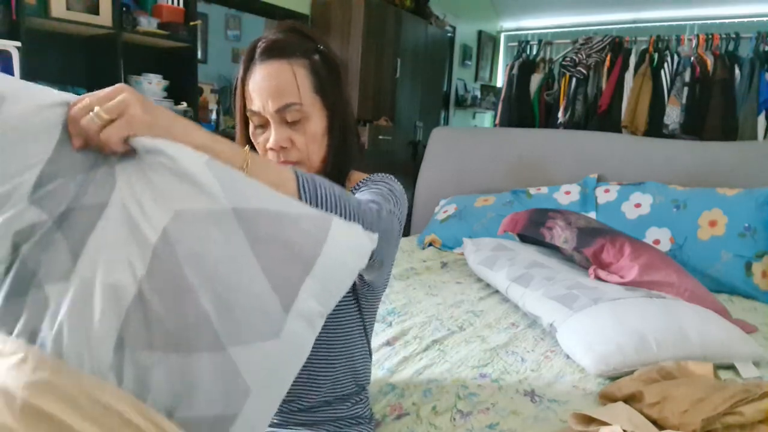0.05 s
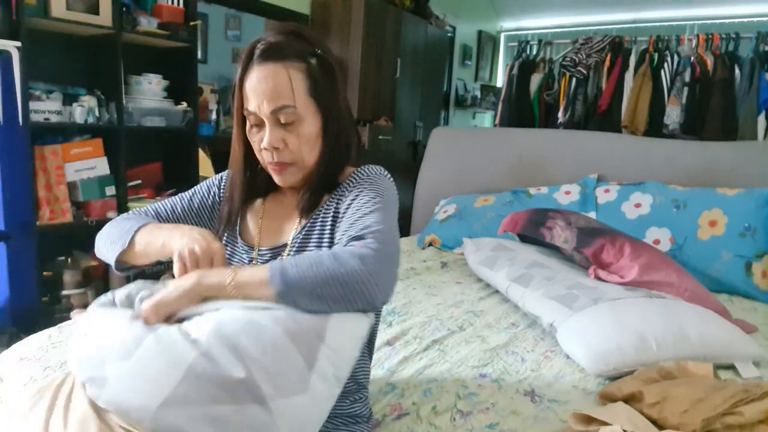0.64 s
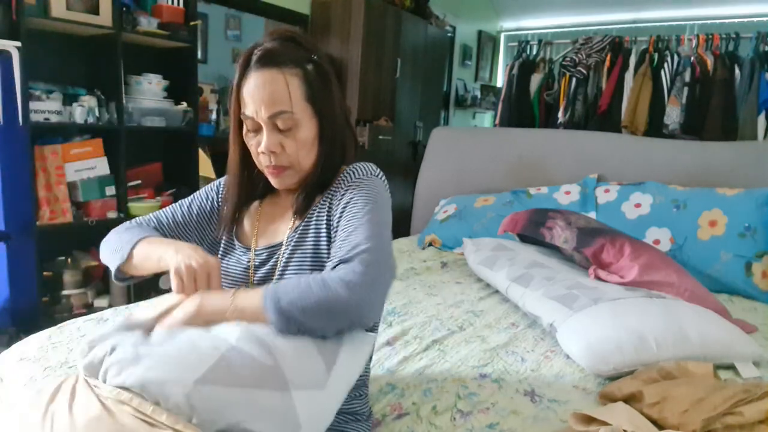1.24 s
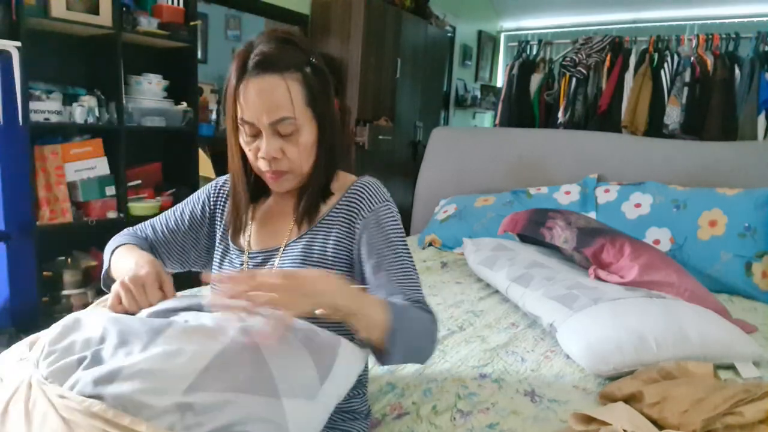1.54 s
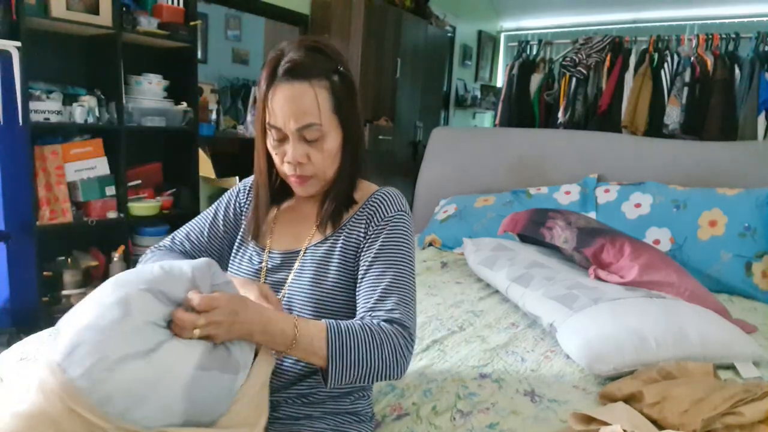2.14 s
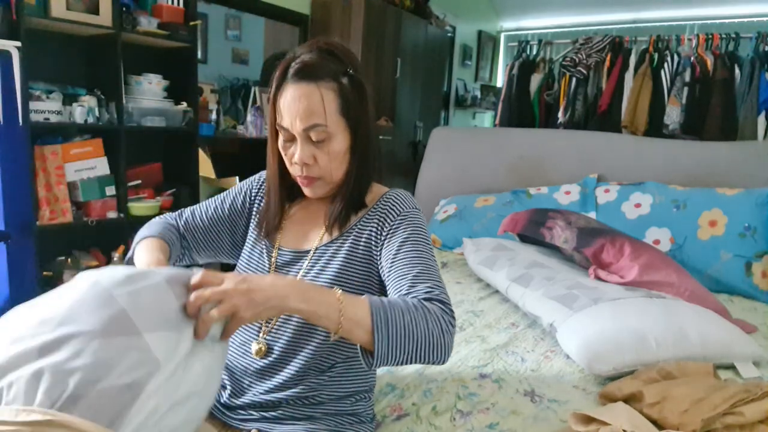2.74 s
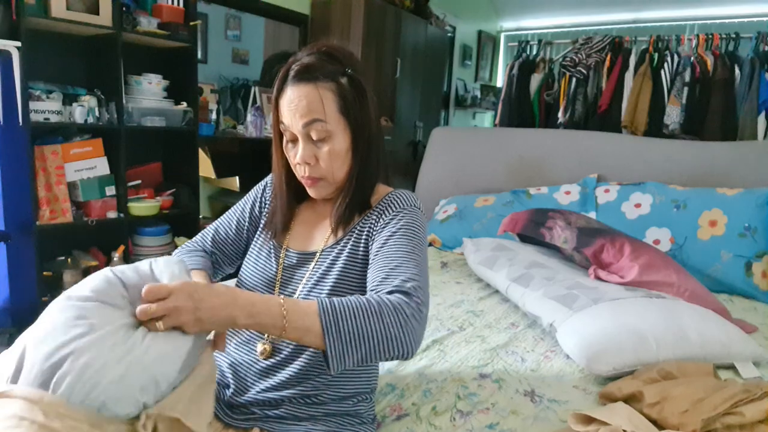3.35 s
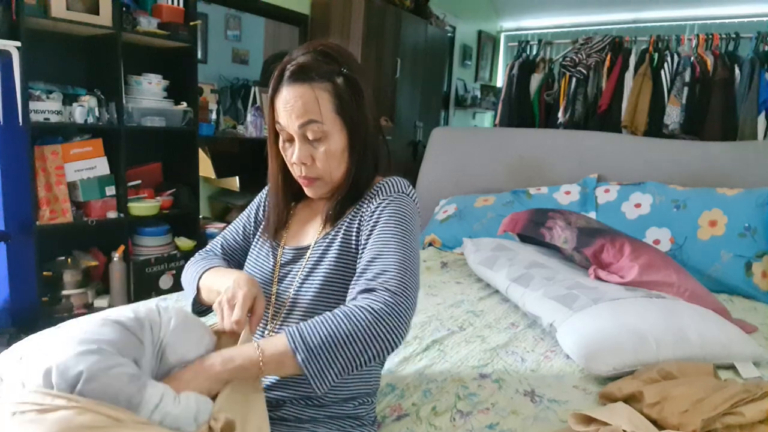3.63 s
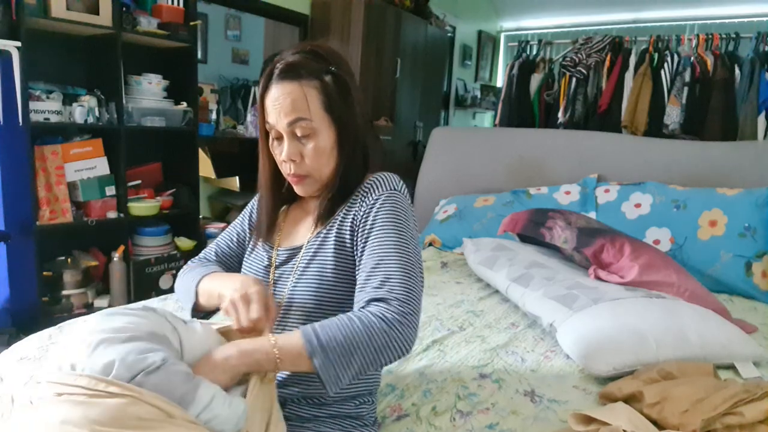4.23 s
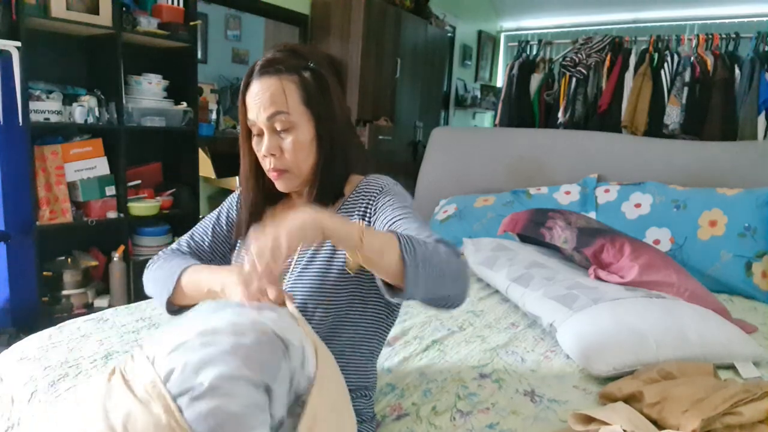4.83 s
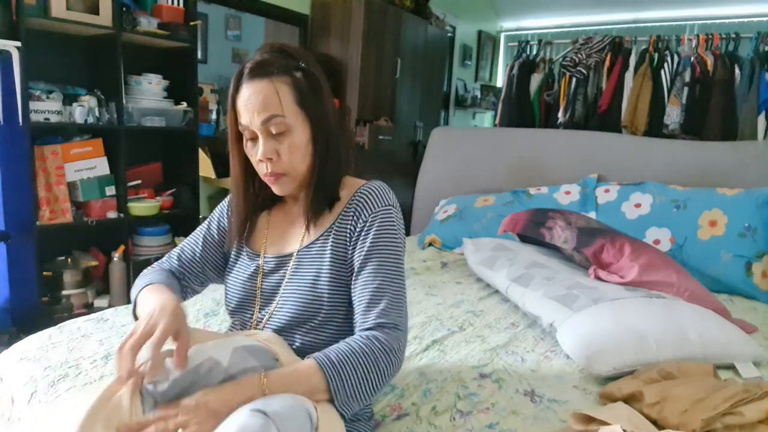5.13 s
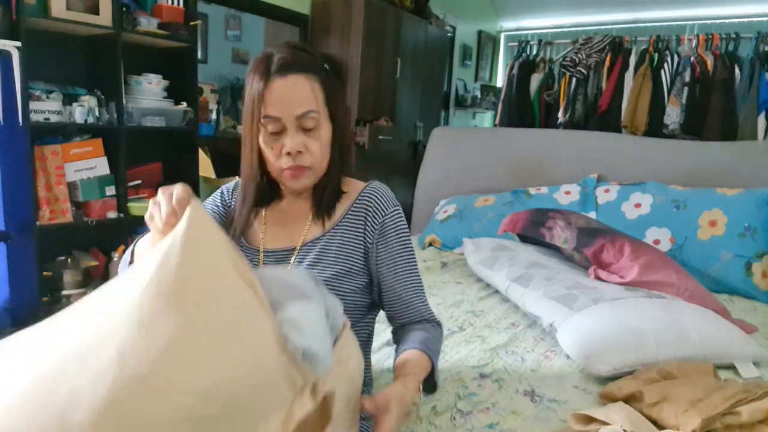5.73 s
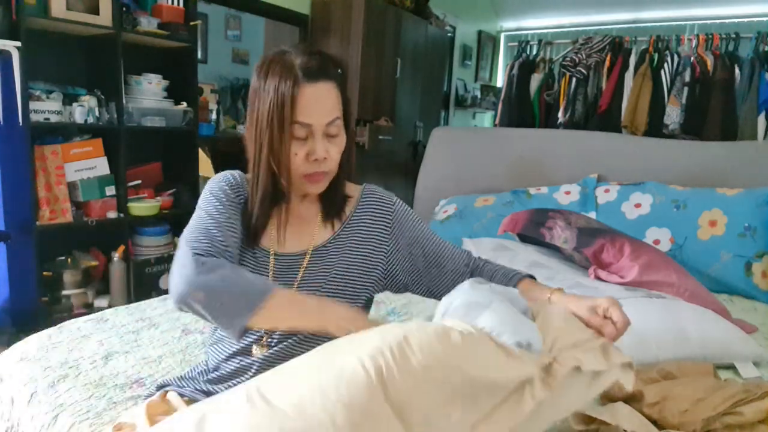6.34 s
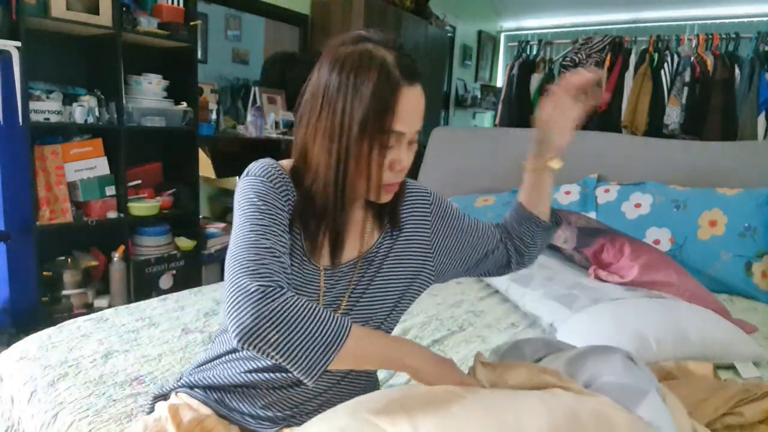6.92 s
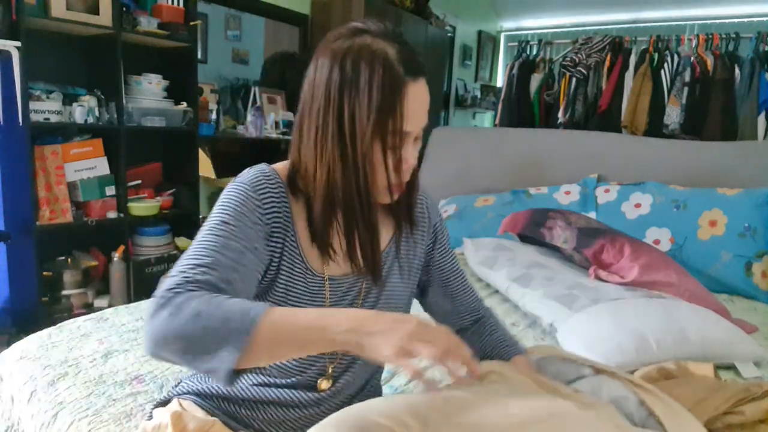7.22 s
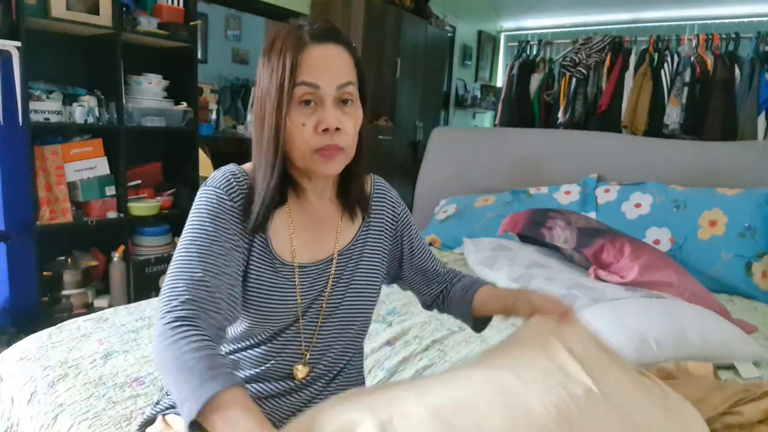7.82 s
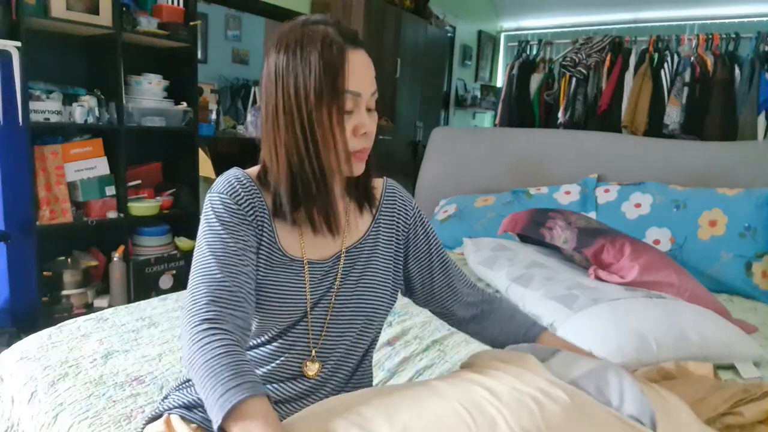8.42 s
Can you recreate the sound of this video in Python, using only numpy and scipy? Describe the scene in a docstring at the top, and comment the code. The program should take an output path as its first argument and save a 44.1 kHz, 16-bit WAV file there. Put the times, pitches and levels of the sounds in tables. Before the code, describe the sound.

Soft cloth rustles as a pillow is worked into its case, then come two loud slaps on the pillow and a lighter one.

```python
"""Three slaps on a pillow: each a smack of palm on cotton, a push of air and a boom from the bed.
Around them the pillow is worked into its case: threads hiss, stuffing rubs, folds pop taut
and jewellery clinks on the moving hands, all in a small furnished bedroom.
Outside, over a low rumble, an engine hums away, a small horn toots twice and something calls far off."""
import sys
import numpy as np
from scipy import signal
from scipy.fft import rfft, irfft, next_fast_len
from scipy.io import wavfile
from scipy.ndimage import uniform_filter1d

SR = 44100
rng = np.random.default_rng(int(sys.argv[2]) if len(sys.argv) > 2 else 0)


def transcribe(u):
    """Save the signal u as a 16-bit wav file named by the first command-line argument.

    u: samples, shape (n,) or (channels, n), limited to [-1, 1]; the rate is SR.
    q: integer samples, one column per channel.
    """
    v = np.clip(np.atleast_2d(u).T, -1, 1)
    q = np.round(v * 32767).astype(np.int16)
    wavfile.write(sys.argv[1], SR, q)


N = 377932
TIME = np.arange(N) / SR


def amp(db):
    """Decibels to gain."""
    return 10 ** (np.asarray(db) / 20)


def unit(x):
    """Scales to an rms of one."""
    return x / np.sqrt(np.mean(x ** 2) + 1e-20)


def read(curve, hz):
    """Reads a curve on a log-frequency axis."""
    f, value = np.transpose(curve)
    return np.interp(np.log(hz + 1), np.log(np.abs(f) + 1), value)


def add(mix, s, sound):
    """Drops a sound into the mix at time s."""
    part = mix[..., max(round(s * SR), 0):][..., :sound.shape[-1]]
    part += sound[..., :part.shape[-1]]


def bins(x):
    """Frequencies of the spectrum of x."""
    return np.fft.rfftfreq(x.shape[-1], 1 / SR)


def colour(x, eq):
    """Applies an EQ curve and scales to an rms of one."""
    return unit(irfft(rfft(x) * amp(read(eq, bins(x))), x.shape[-1]))


def drift(rate_hz):
    """Random modulation, smooth above the given rate."""
    noise = rng.standard_normal(next_fast_len(N, real=True))
    return unit(irfft(rfft(noise) / (1 + (bins(noise) / rate_hz) ** 4), len(noise))[:N])


def touch(t, swell, fall):
    """Contact force: a smooth hump with its own rise and fall."""
    return np.exp(-(t / np.where(t < 0, swell, fall)) ** 2)


def delay_pan(x, lag_s):
    """Places a near sound by making it reach the left ear late (early if negative)."""
    left = irfft(rfft(x) * np.exp(-2j * np.pi * bins(x) * lag_s), len(x))
    return np.array([left, x])


def burst(t, envelope, eq, even_hz=300):
    """A puff of noise, flattened and then EQed, with the energy of its envelope."""
    spectrum = rfft(rng.standard_normal(len(t)) * envelope)
    width = max(round(even_hz * len(t) / SR), 1)
    spectrum /= np.sqrt(np.abs(uniform_filter1d(np.abs(spectrum) ** 2, width)) + 1e-20)
    return colour(irfft(spectrum, len(t)), eq) * np.sqrt(np.mean(envelope ** 2))


# Stereo image of diffuse sound: f/Hz, left-right correlation
STEREO_LIKENESS = [(60, 0.9), (130, 0.95), (290, 0.58), (640, 0.35), (1410, -0.19), (3100, 0.027),
                   (7000, -0.28)]


def diffuse(pair):
    """Long waves reach both ears alike: centred bass, wide treble."""
    left, other = rfft(pair)
    likeness = np.clip(read(STEREO_LIKENESS, bins(pair)), -1, 1)
    right = likeness * left + np.sqrt(1 - likeness ** 2) * other
    return irfft(np.array([left, right]), pair.shape[-1])


# Short, dead bedroom reverb: f/Hz, t60/s
ROOM_DECAY = [(100, .32), (500, 0.16), (2000, 0.17), (6000, 0.16), (12000, 0.12)]


def room(x, wet_db, predelay_s=0.0011):
    """Dense reflections from near walls, each band dying at its own speed."""
    taps = diffuse(rng.standard_normal((2, SR // 2)))
    hz, t, bands = signal.stft(taps, SR, nperseg=256)
    decay = amp(-60 * t / read(ROOM_DECAY, hz)[:, None])
    tail = signal.istft(bands * decay, SR, nperseg=256)[1]
    tail *= np.clip(np.arange(tail.shape[1]) / SR / predelay_s - 1, 0, 1)
    tail /= np.linalg.norm(tail[0])
    return amp(wet_db) * signal.fftconvolve(x[None], tail, axes=1)[:, :N]


# Bass-heavy EQ of the ambience: f/Hz, level/dB
RUMBLE_EQ = [(15, -54), (25, -11.5), (59, 7.5), (120, -3.5), (180, -12), (236, -9), (301, -16.5),
             (575, -22.5), (1230, -29), (1560, -24), (2000, -30.5), (6740, -42.5), (9320, -51),
             (14800, -51.5), (16000, -41.5)]


def room_tone(level_db=-56, swell_db=0.6):
    """Low, gently swelling rumble of the house and the traffic beyond."""
    rumble = colour(diffuse(rng.standard_normal((2, N))), RUMBLE_EQ)
    return amp(level_db + swell_db * drift(2.8)) * rumble


# Fader ride of the engine as it moves off: t/s, level/dB
ENGINE_FADE = [(0, -62.5), (1.2, -59.5), (2.2, -62), (3.4, -60.5), (4.2, -66.5), (4.8, -63.5), (5.3, -82)]


def engine(firing_hz=127.8, sag_hz_per_s=1.15, waver=.004, octave_db=-12, throb_db=.9):
    """An engine in the street hums at its slowly sinking firing rate."""
    s, db = np.transpose(ENGINE_FADE)
    pitch = (firing_hz - sag_hz_per_s * TIME) * (1 + waver * drift(9.3))
    phase = 2 * np.pi * np.cumsum(pitch) / SR
    hum = unit(np.sin(phase) + amp(octave_db) * np.sin(2 * phase))
    return amp(np.interp(TIME, s, db) + throb_db * drift(4)) * hum


def far_tone(pitch, fading):
    """A sine that fades in and out as its many paths interfere."""
    start = rng.integers(N - SR)
    return np.sin(2 * np.pi * np.cumsum(pitch) / SR) * fading[start:][:len(pitch)]


# Horn cues: t/s, length/s, level/dB
HORN_TOOTS = [(1.9, 0.27, -63), (2.16, 0.24, -63)]
# Thin ring of its diaphragm: harmonic number, level/dB
HORN_PARTIALS = [(6, -21), (7, -16), (8, 4.5), (9, -10), (10, -8.5)]


def horn(wobble, fading, root_hz=447.4, waver=.0025):
    """A small horn toots twice, its diaphragm ringing in high harmonics."""
    out = np.zeros(N)
    for s, length, db in HORN_TOOTS:
        count = round(length * SR)
        pitch = root_hz * (1 + waver * wobble[round(s * SR):][:count])
        tone = sum(amp(level) * far_tone(k * pitch, fading) for k, level in HORN_PARTIALS)
        add(out, s, amp(db) * unit(tone) * np.hanning(count))
    return out


# Distant call cues: t/s, length/s, start f/Hz, end f/Hz, level/dB
CALL_GLIDES = [(2.5, 0.32, 1925, 1870, -79.5), (3.119, 0.3, 1886, 1880, -80),
               (5.345, 0.054, 1454, 1418, -59), (7.044, 0.12, 837, 554, -60), (7.67, 0.16, 531, 513, -62.5),
               (7.86, 0.15, 505, 478, -61)]


def far_calls(wobble, fading, waver=0.032):
    """Faint calls, each one wavering tone that slides down."""
    out = np.zeros(N)
    for s, length, start_hz, end_hz, db in CALL_GLIDES:
        count = round(length * SR)
        pitch = np.linspace(start_hz, end_hz, count) * (1 + waver * wobble[round(s * SR):][:count])
        add(out, s, amp(db) * unit(far_tone(pitch, fading)) * signal.windows.tukey(count, .6))
    return out


def street(flutter_db=2):
    """The outdoor layer: the engine stays dry, horn and calls echo in the room."""
    hum = engine()
    wobble, fading = drift(120), amp(flutter_db * drift(14))
    far = horn(wobble, fading) + far_calls(wobble, fading)
    return hum + amp(-3) * far + room(far, wet_db=0)


# Bracelet and chain hits: t/s, level/dB, ring f/Hz
LINK_HITS = [(1.295, -64.5, 9600), (1.598, -50, 5220), (1.607, -57, 5070), (1.621, -60, 9700),
             (1.653, -59, 4970), (1.767, -57, 13000), (5.084, -82, 9300), (5.51, -68, 9600),
             (7.057, -68, 10600), (7.539, -55.5, 10400), (7.964, -72, 10900), (8.242, -47, 10240)]
# Broad EQ of the tick and narrow EQ of the ring: multiple of the ring pitch, level/dB
TICK_EQ = [(.25, -24.5), (.7, -6), (1, 11.5), (1.3, 0), (1.7, -2.5), (3, -6)]
RING_EQ = [(.5, -35), (.88, -19), (.97, -3), (1, 0), (1.05, -5), (1.12, -11), (1.25, -22), (2, -30)]


def jewellery(ring_db=-7, ring_fall=0.012, tick_fall=0.0026):
    """Small metal links touch: a dry tick and a short, rattling ring."""
    t, out = np.arange(2 ** 13) / SR, np.zeros((2, N))
    skin_damping = np.exp(-t / .04)
    for s, db, hz in LINK_HITS:
        tick = burst(t, np.exp(-t / tick_fall), np.array(TICK_EQ) * [hz, 1])
        ring = burst(t, np.exp(-t / ring_fall), np.array(RING_EQ) * [hz, 1])
        add(out, s, amp(db) * (tick + amp(ring_db) * ring) * skin_damping)
    return out * amp([[-1.5], [1.5]]) + room(out.mean(0), wet_db=-4)


# Folds pulled taut: t/s, level/dB, f/Hz, decay/s
FOLD_POPS = [(1.044, -52, 666, 0.0027), (1.483, -57.5, 760, .0015), (1.606, -55, 587, 0.0034),
             (2.329, -33.5, 667, 0.00087), (2.536, -52, 666, 0.0012), (3.125, -47, 550, 0.0029),
             (3.33, -49.5, 182, 0.0037), (4.329, -49, 636, 0.0015), (4.397, -50.5, 610, 0.005),
             (4.45, -53, 520, 0.011), (5.558, -45, 730, 0.0021), (5.981, -56.5, 600, 0.0056),
             (6.481, -51, 280, 0.0059), (6.916, -56.5, 474, 0.0093), (7.887, -55, 650, 0.0016)]


def flicks(attack_s=0.00046, skirt_db=-14, lead_s=.02):
    """A slack fold snaps taut with a soft, hollow pop."""
    t, out = np.arange(2 ** 13) / SR - lead_s, np.zeros(N)
    for s, db, hz, fall in FOLD_POPS:
        hollow = [(hz / 8, -25), (hz / 1.55, -8), (hz, 0),
                  (hz * 1.35, skirt_db), (hz * 4, -24), (hz * 16, -48)]
        envelope = np.exp(np.minimum(t / attack_s, -t / fall))
        add(out, s - lead_s, amp(db) * burst(t, envelope, hollow))
    return delay_pan(out, -0.00016) + room(out, wet_db=-5)


def shifting_folds(x, depth_db, patch_frames=12, patch_bins=4):
    """Moving folds lift and shade narrow bands for a moment."""
    bands = signal.stft(x, SR, nperseg=512)[2]
    patches = uniform_filter1d(rng.standard_normal(bands.shape[1:]), patch_bins, 0)
    patches = unit(uniform_filter1d(patches, patch_frames, 1))
    return unit(signal.istft(bands * amp(depth_db * patches), SR, nperseg=512)[1][:, :N])


def effort(times, lengths, levels_db, fidget_db, rise_share=0.6, swing_db=2, flutter_db=1.36):
    """A hand gathers speed and stops; between strokes the cloth never lies quite still."""
    power = amp(fidget_db + swing_db * drift(5.1)) ** 2
    for s, length, db in zip(times, lengths, levels_db):
        power += (amp(db) * touch(TIME - s, rise_share * length, (1 - rise_share) * length)) ** 2
    return np.sqrt(power) * amp(flutter_db * drift(30))


# Pushes and pulls on the case: peak t/s, length/s, hiss level/dB, rub level/dB
HAND_STROKES = [(.05, 0.25, -79, -66.5), (0.275, 0.17, -68.5, -65), (0.465, 0.22, -74.5, -73),
                (1.03, 0.13, -74, -81), (1.415, 0.13, -69, -64), (1.632, 0.075, -66, -67),
                (1.88, 0.21, -74.5, -70.5), (2.05, 0.078, -77, -75.5), (2.31, 0.34, -70.5, -70),
                (2.469, 0.083, -67.5, -72), (3.19, 0.12, -82, -67), (3.57, 0.26, -73.5, -79),
                (3.71, 0.12, -62, -65.5), (3.912, 0.064, -72, -69), (4.075, 0.084, -75, -86),
                (4.295, 0.11, -68, -64.5), (4.534, 0.17, -62.5, -63.5), (4.78, 0.13, -74, -72),
                (4.924, 0.098, -65.5, -71), (5.46, 0.38, -74, -72), (5.653, 0.13, -58.5, -57.5),
                (6.074, 0.13, -73, -63), (6.225, 0.054, -61, -62), (6.42, 0.58, -77, -72),
                (6.634, .05, -73.5, -82.5), (6.784, 0.18, -76.5, -74), (6.86, .04, -68.5, -67),
                (7.112, 0.22, -67.5, -65), (7.584, 0.16, -84, -64), (7.745, 0.31, -77, -68.5),
                (7.95, 0.11, -79.5, -65.5), (8.555, .15, -81, -62.5)]
# Bright EQ of the threads and dull EQ of the stuffing: f/Hz, level/dB
HISS_EQ = [(800, 0), (1800, -5.5), (3000, 1), (5000, 0), (7300, -0.5), (9200, -9), (13000, -11.5),
           (16000, -13.5)]
RUB_EQ = [(60, -2), (180, 2), (350, 0), (600, 2), (1000, -7), (1700, -11), (3000, -15.5), (8000, -77.5)]


def cloth(snags_per_s=350, snag_spread_db=4, snag_gain=0.35):
    """Threads catch and slip in a fine hiss, over the duller rub of the stuffing."""
    times, lengths, hiss_db, rub_db = np.transpose(HAND_STROKES)
    speed = effort(times, lengths, hiss_db, fidget_db=-84)
    pressure = effort(times, lengths, rub_db, fidget_db=-73)
    snags = (rng.random(N) < snags_per_s / SR) * rng.standard_normal(N)
    snags *= amp(snag_spread_db * np.minimum(rng.exponential(1, N), 3))
    grain = snag_gain * unit(delay_pan(snags, -.00015))
    hiss = shifting_folds(colour(rng.standard_normal((2, N)) + grain, HISS_EQ), depth_db=2)
    rub = colour(diffuse(rng.standard_normal((2, N))) + grain, RUB_EQ)
    return speed * hiss + pressure * rub


# Low modes of mattress and room: f/Hz, level/dB, t60/s
BED_MODES = [(54.7, 5, 0.43), (81.7, 7.5, 0.2), (116, -0.5, 0.3), (137.6, 6.5, 0.21), (178, -6.5, 0.27),
             (242.3, -1, 0.16), (345.4, -13.5, 0.22)]


def thud(t, tilt_db, give_s=0.003, push_s=0.002):
    """The low end of a slap: a push of air escapes and the bed booms."""
    after = np.maximum(t, 0)
    boom = np.zeros(len(t))
    for k, (hz, db, t60) in enumerate(BED_MODES):
        tilted_db = db + tilt_db * np.log2(hz / BED_MODES[0][0])
        boom += (-1) ** k * amp(tilted_db - 60 * after / t60) * np.sin(2 * np.pi * hz * after)
    boom *= 1 - np.exp(-after / give_s)  # the stuffing gives way gradually
    age = after / push_s
    push = age * (2 - age) * np.exp(-age)
    return boom / abs(boom).max() + push / push.max()


# Base EQ of palm on cotton: f/Hz, level/dB
PALM_EQ = [(30, -13), (100, -0.5), (300, 1.5), (460, -5), (720, -4), (1100, -13), (1650, -10), (2200, -15),
           (3100, -12.5), (5500, -13), (7500, -16), (9500, -23.5), (13000, -23.5), (16000, -31)]


def smack_eq(pocket_hz, pocket_db, crack_hz, sheen_db, crack_db=9):
    """Air trapped under the palm and between the fingers lifts two bands; a shelf sets the sheen."""
    hz = np.geomspace(30, 16000, 200)
    pocket = pocket_db * np.exp(-(np.log2(hz / pocket_hz) / 0.26) ** 2)
    crack = crack_db * np.exp(-(np.log2(hz / crack_hz) / .085) ** 2)
    sheen = sheen_db / (1 + (9000 / hz) ** 6)
    return np.column_stack([hz, read(PALM_EQ, hz) + pocket + crack + sheen])


# Hand hits, the last two merging into one slap: t/s, smack level/dB, attack/s, decay/s, pocket f/Hz,
# pocket boost/dB, crack f/Hz, sheen/dB, thud level/dB, thud tilt/(dB per octave), left ear lag/s
PALM_HITS = [(5.1426, -16, 0.0058, 0.0037, 598, 12, 1490, -9.5, -21, -8.5, -.0002),
             (7.246, -12.5, 0.0027, 0.0013, 842, 8, 2960, -4.5, -7.5, 0.5, .00014),
             (8.039, -32.5, 0.029, 0.0052, 690, 2, 5220, -6, -33.5, -6, .00011),
             (8.0493, -29.5, 0.0015, 0.0013, 149, 16, 5330, 4, -28, -0.5, .00011)]


def slaps(palm_share=0.45, low_cut_hz=52, lead_s=.08):
    """A hand lands on the pillow: a sharp smack of cloth on top of a deep thud."""
    t = np.arange(2 ** 15) / SR - lead_s
    smacks, reverb_send, thuds = np.zeros((2, N)), np.zeros(N), np.zeros(N)
    for s, db, swell, fall, pocket_hz, pocket_db, crack_hz, sheen_db, thud_db, tilt_db, lag in PALM_HITS:
        start = s - lead_s
        eq = smack_eq(pocket_hz, pocket_db, crack_hz, sheen_db)
        fingers = touch(t, swell, fall)
        palm = touch(t, swell * palm_share, fall * palm_share)
        contact = (fingers + palm) / 2  # the fingers brush, then the palm lands
        add(smacks, start, delay_pan(amp(db) * burst(t, contact, eq, even_hz=514), lag))
        add(reverb_send, start, amp(db) * burst(t, contact, eq))  # the walls get it from other angles
        add(thuds, start, amp(thud_db) * thud(t, tilt_db))
    # the lowest bass of the thuds is cut away
    thuds = signal.sosfilt(signal.butter(2, low_cut_hz, "high", fs=SR, output="sos"), thuds)
    return smacks + room(reverb_send, wet_db=-3.5) + thuds * amp([[-.7], [.7]])


def scene():
    """Ambience under the close action, leaning a little to the right."""
    ambience = (room_tone() + street()) * amp([[-1], [1]])
    return ambience + cloth() + flicks() + jewellery() + slaps()


def record(dry, cutoff_hz=15900):
    """A steep low-pass trims the very top of the mix."""
    lowpass = signal.firwin(511, cutoff_hz, window=("kaiser", 9), fs=SR)
    return signal.oaconvolve(dry, lowpass[None], "same")


dry = scene()
out = record(dry)
transcribe(out)
```